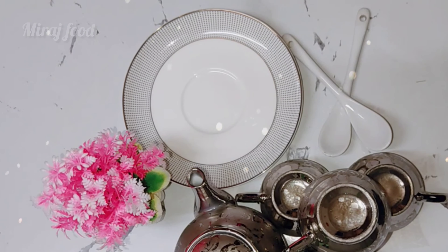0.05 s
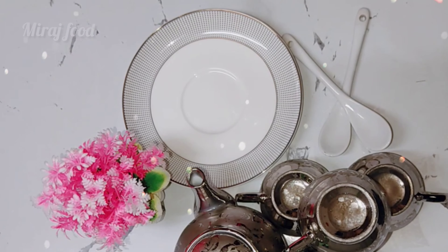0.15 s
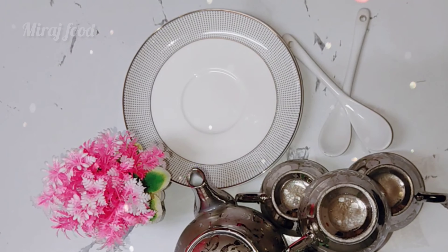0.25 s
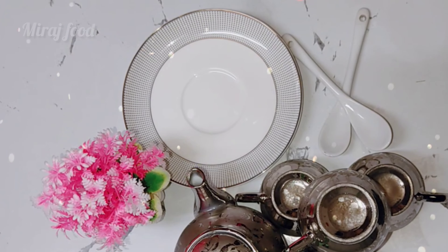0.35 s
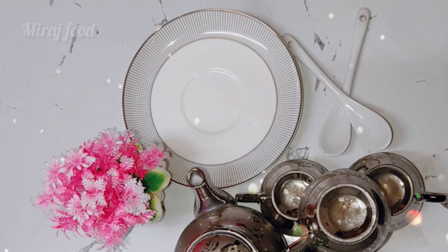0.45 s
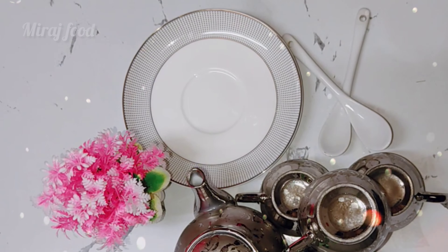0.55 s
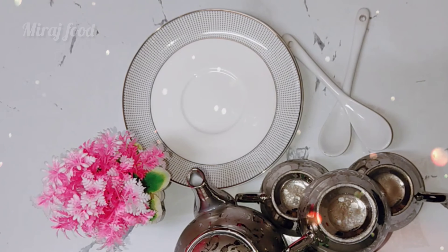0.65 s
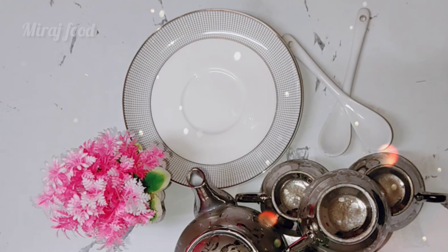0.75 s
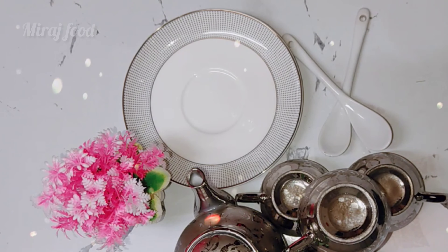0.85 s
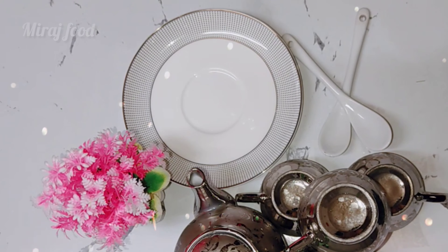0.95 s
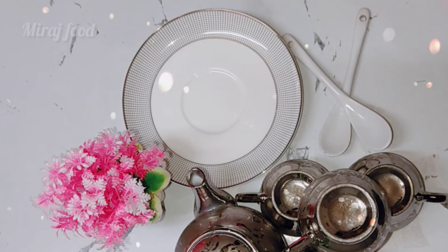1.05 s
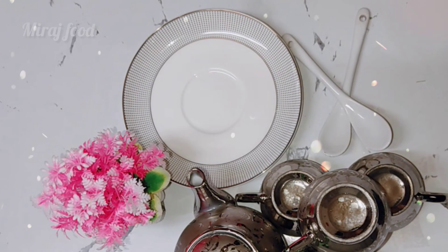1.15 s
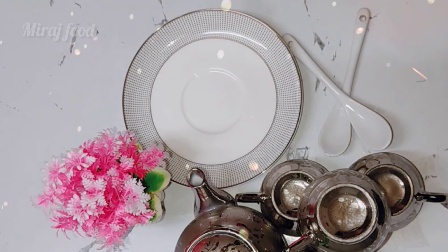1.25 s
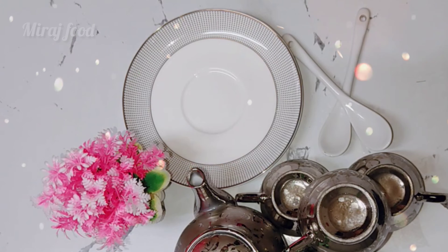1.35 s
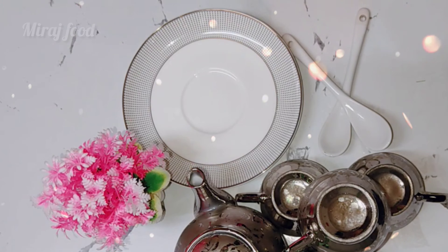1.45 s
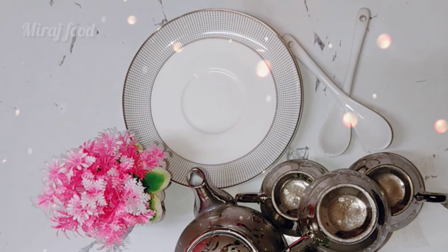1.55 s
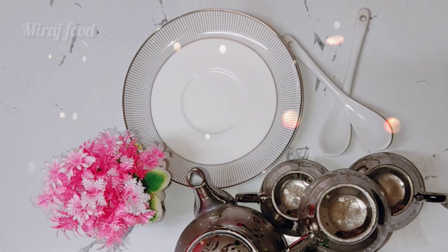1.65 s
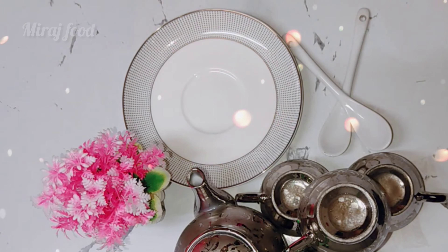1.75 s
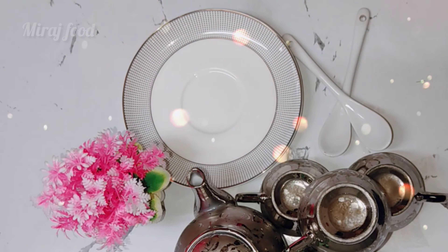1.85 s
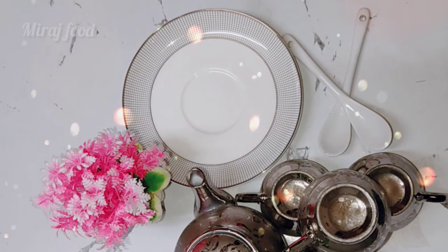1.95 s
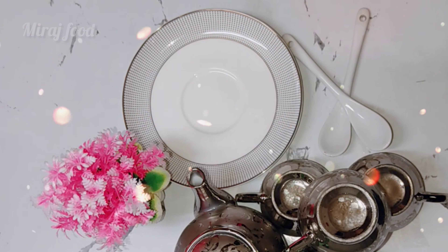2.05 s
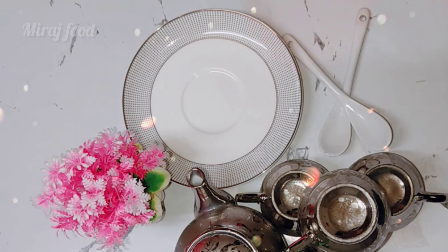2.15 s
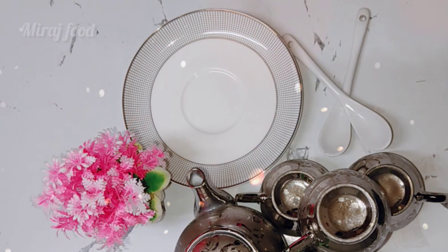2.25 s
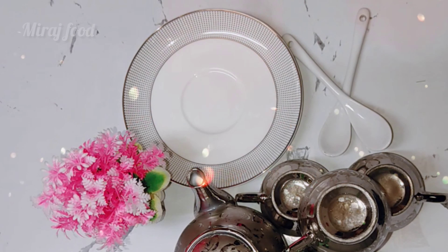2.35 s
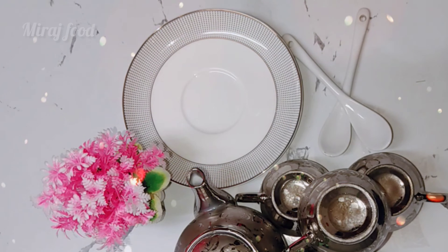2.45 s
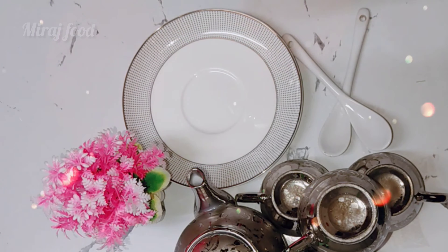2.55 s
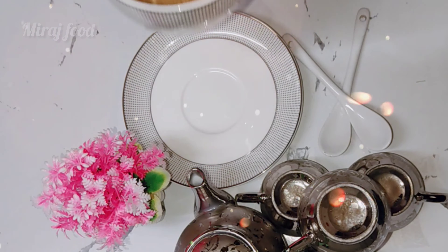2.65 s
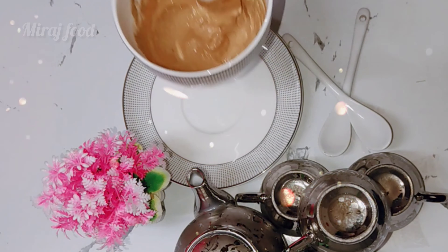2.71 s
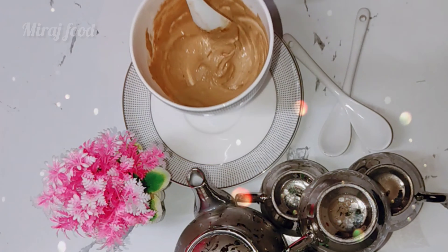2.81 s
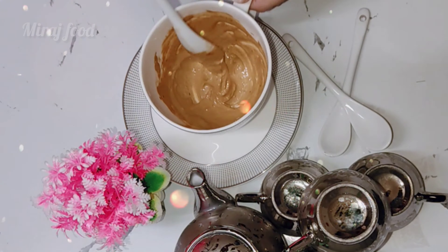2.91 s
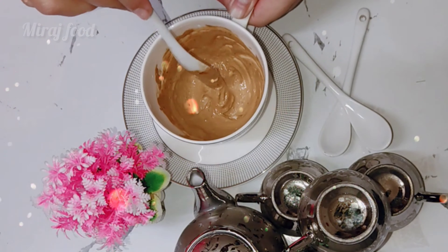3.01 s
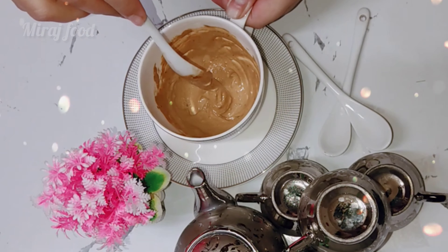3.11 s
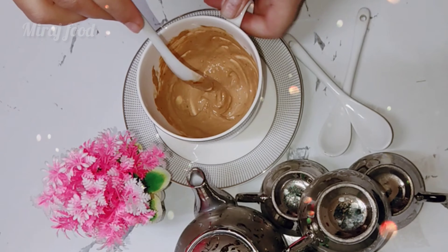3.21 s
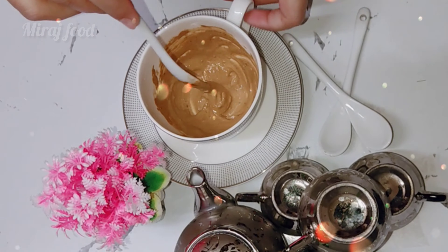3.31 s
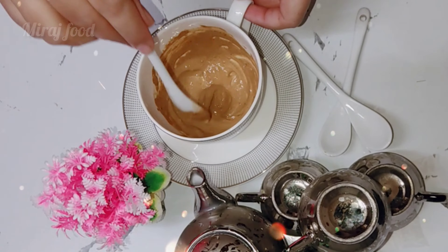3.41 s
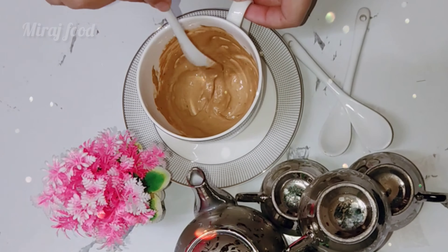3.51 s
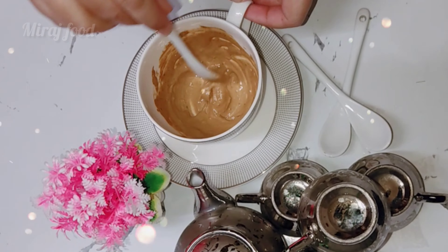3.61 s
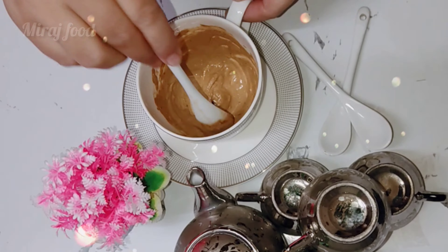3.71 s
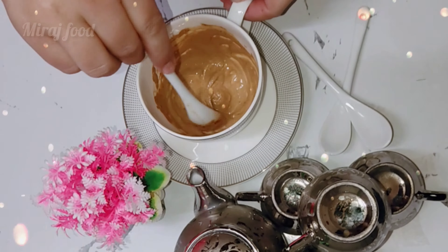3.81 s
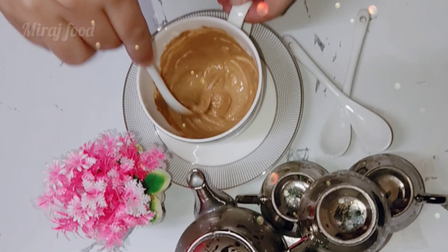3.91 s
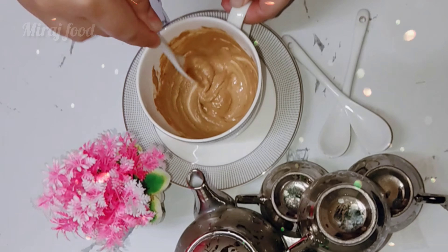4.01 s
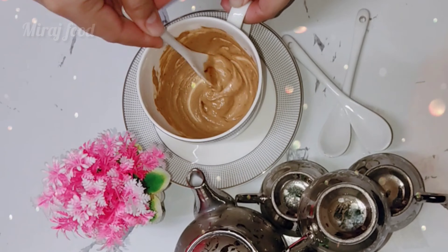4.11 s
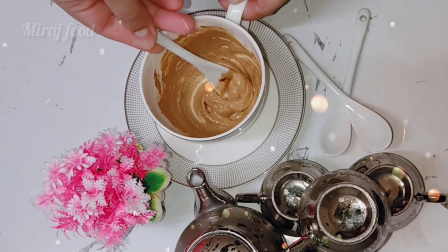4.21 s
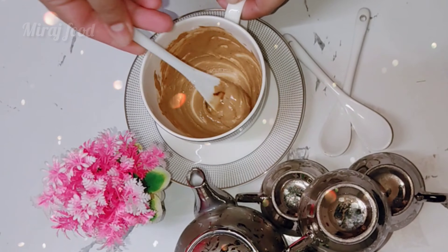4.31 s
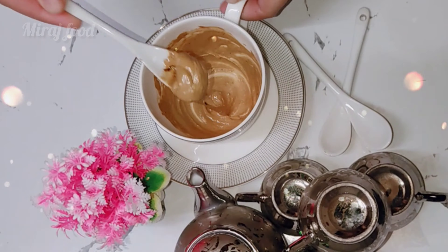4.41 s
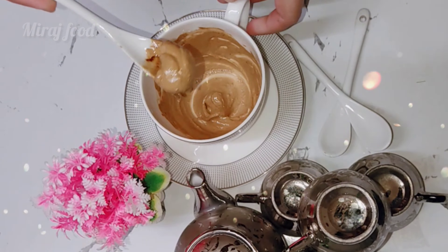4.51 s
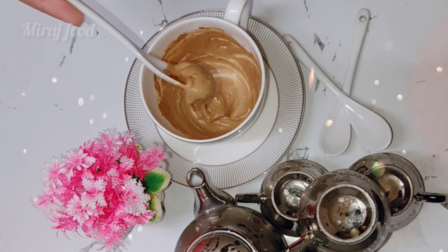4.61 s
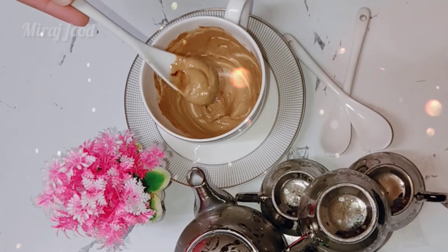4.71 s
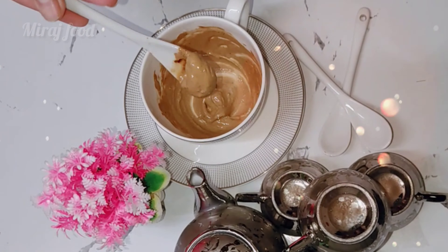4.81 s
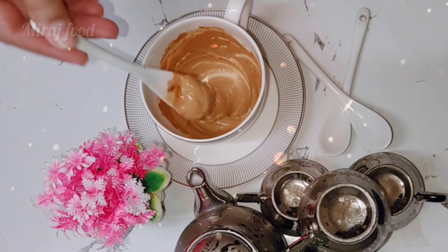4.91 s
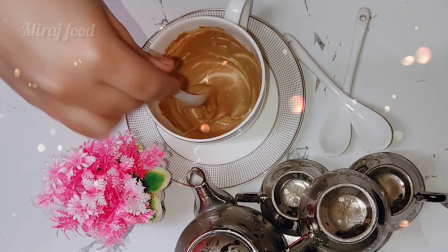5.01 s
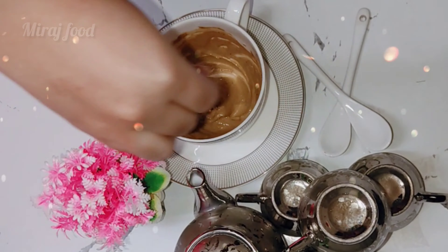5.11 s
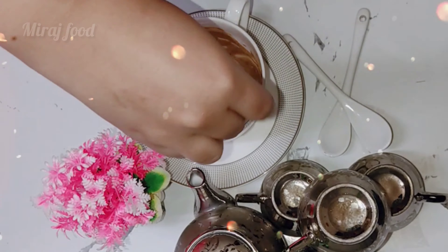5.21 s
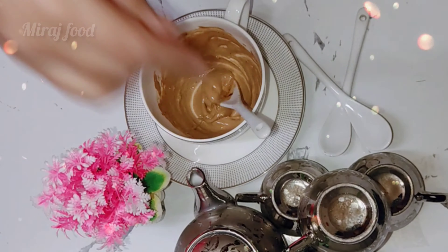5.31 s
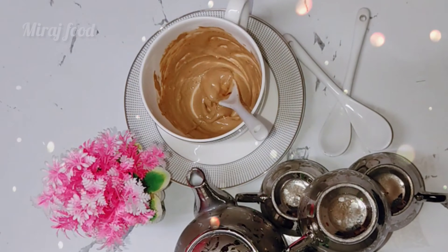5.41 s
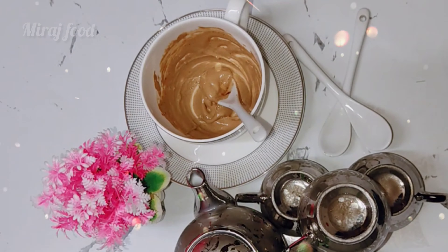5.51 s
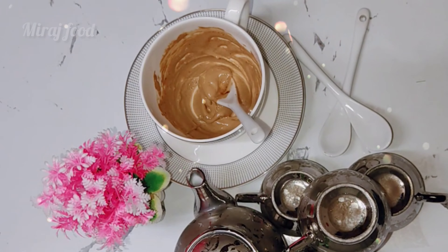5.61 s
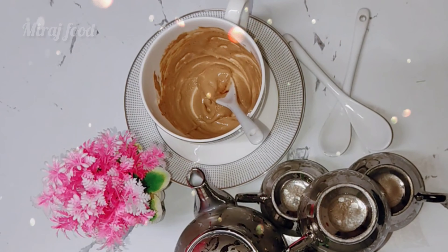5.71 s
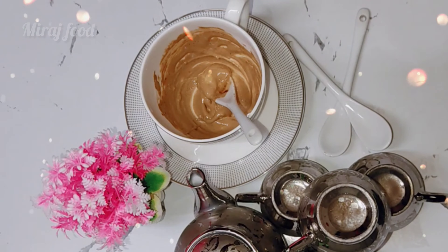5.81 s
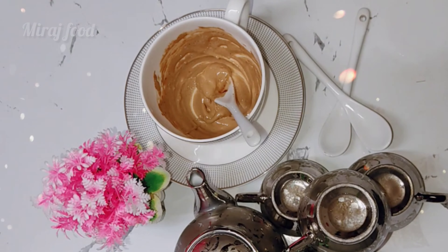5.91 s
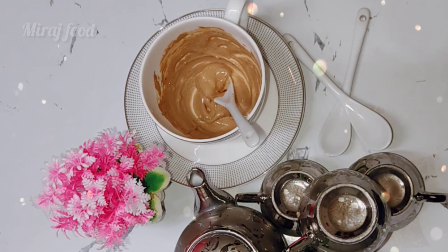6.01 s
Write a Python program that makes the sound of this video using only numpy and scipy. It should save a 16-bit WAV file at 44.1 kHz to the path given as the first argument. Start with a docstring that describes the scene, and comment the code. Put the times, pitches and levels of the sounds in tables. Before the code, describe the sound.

Light scrapes and taps of a spoon in a cup of thick cream, a knock on a saucer and one loud, bright ceramic clink.

```python
"""A ceramic spoon stirs thick cream in a cup: tiny slips on the glaze ring spoon and cup together,
while cream and fingers rustle and tick. The cup knocks onto its saucer, the table is bumped, and
the spoon drops on the rim, bounces and sinks into the cream. A quiet kitchen hums underneath,
its hiss lifted in the treble by a small microphone, and birds call faintly outside."""
import sys
import numpy as np
from scipy import signal
from scipy.fft import rfft, irfft, next_fast_len
from scipy.io import wavfile
from scipy.ndimage import uniform_filter1d

SR = 44100
rng = np.random.default_rng(int(sys.argv[2]) if len(sys.argv) > 2 else 0)


def int16_out(signal):
    """Quantize to a 16-bit WAV file."""
    q = np.round(np.clip(np.atleast_2d(signal).T, -1, 1) * 32767)
    wavfile.write(sys.argv[1], SR, q.astype(np.int16))


N = 267059


def amp(db):
    """Gain of a level in dB."""
    return 10 ** (np.asarray(db) / 20)


def unit_rms(x):
    """Scales to rms 1."""
    return x / np.sqrt(np.mean(x ** 2) + 1e-20)


def add(mix, start_s, peak_db, sound):
    """Mixes a sound in at the given peak level."""
    part = mix[round(start_s * SR):][:len(sound)]
    part += (amp(peak_db) * sound / abs(sound).max())[:len(part)]


def noise(count, spectrum):
    """Noise of rms 1 with the amplitude spectrum given as a function of Hz."""
    size = next_fast_len(count)
    hz = np.fft.rfftfreq(size, 1 / SR) + 1
    return unit_rms(irfft(rfft(rng.standard_normal(size)) * spectrum(hz), size)[:count])


def humps(bands):
    """Spectrum of bell curves. Each band: centre in Hz, width in Hz, level in dB."""
    return lambda hz: sum(amp(db) * np.exp(-2 * ((hz - centre) / width) ** 2)
                          for centre, width, db in bands)


# Room hiss. Each row: frequency in Hz, relative level in dB.
HISS_SPECTRUM = [(8.8, -31), (15, 3.5), (48, -12.5), (181, -25), (273, -26.5), (355, -27.5), (411, -29.5),
                 (1110, -37), (7920, -46), (15100, -45), (16500, -56.5)]
# Drone and rumble envelopes. Each row: time in seconds, level in dB.
DRONE_LEVELS = [(0, -77), (.35, -72.5), (.81, -72.5), (1.1, -82.5), (3.3, -85.5), (3.44, -69), (3.77, -89),
                (4.08, -77.5), (4.8, -80), (5.4, -90), (6.05, -76.5)]
RUMBLE_LEVELS = [(0, -65.5), (1, -63.5), (2.05, -75.5), (2.68, -62.5), (3.44, -70.5), (4.05, -63),
                 (4.55, -72.5), (5.2, -64.5), (6.05, -65)]


def room_tone():
    """Steady hiss lifted by the microphone's treble resonance, a wavering drone and deep rumble."""
    t = np.arange(N) / SR
    hiss_hz, hiss_db = np.transpose(HISS_SPECTRUM)
    shape = lambda hz: amp(np.interp(np.log(hz), np.log(hiss_hz), hiss_db))
    mic_lift = humps([(8500, 2100, -4.5)])
    hiss = amp(-67.5) * noise(N, lambda hz: shape(hz) * (1 + mic_lift(hz)))
    drone = amp(np.interp(t, *np.transpose(DRONE_LEVELS))) * noise(N, humps([(134, 86, 0)]))
    rumble = amp(np.interp(t, *np.transpose(RUMBLE_LEVELS))) * noise(N, humps([(26.8, 50, 0)]))
    return hiss + drone + rumble


# Movements of cream and hands. Each row: time of peak in seconds, swell in seconds, fade in seconds,
# treble level in dB, mid over treble in dB.
MOVES = [(.08, .09, 0.081, -72.5, -9), (.42, .22, 0.069, -79, 2.5), (.8, .06, .08, -73, -0.5),
         (3.86, .12, 0.54, -77.5, 2), (4.03, 0.15, 0.12, -76.5, -9), (4.14, 0.16, 0.067, -69.5, -6.5),
         (4.721, .11, 0.057, -72, -4), (5.6, .26, 0.15, -70, -5.5), (5.88, .13, 0.16, -68, -3),
         (6.05, .07, .07, -71.5, -7)]
REST_TREBLE_DB, REST_MID_DB, SWELL_DEPTH_DB = -85, -92, 16.5


def movement_gains():
    """Treble and mid rustle gains: each movement swells and fades above the rest level."""
    t = np.arange(N) / SR
    treble_power, mid_power = amp(REST_TREBLE_DB) ** 2, amp(REST_MID_DB) ** 2
    for peak_s, swell_s, fade_s, treble_db, mid_db in MOVES:
        distance = np.maximum((peak_s - t) / swell_s, (t - peak_s) / fade_s)
        power = amp(treble_db - SWELL_DEPTH_DB * distance) ** 2
        treble_power += power
        mid_power += amp(mid_db) ** 2 * power
    return np.sqrt(treble_power), np.sqrt(mid_power)


# Rustle bands. Each row: centre in Hz, width in Hz, relative level in dB.
TREBLE_BANDS = [(7700, 1500, -1.5), (9000, 1300, -1), (5200, 2200, -6), (11550, 3500, -13.5)]
MID_BANDS = [(1100, 1100, 2), (2440, 4000, -5)]


def cream_rustle():
    """Dense small crackles in uneven clumps, brighter or duller as cream and hands move."""
    grains = amp(2.4 * np.minimum(rng.exponential(1, N // 128 + 1), 5))
    crackle = unit_rms(uniform_filter1d(np.repeat(grains, 128)[:N], size=90))
    clumps = uniform_filter1d(rng.standard_normal((len(TREBLE_BANDS), N // 512 + 1)), size=3)
    treble = np.zeros(N)
    for (centre_hz, width_hz, db), clump in zip(TREBLE_BANDS, clumps):
        flicker_db = 6.5 * np.interp(np.arange(N) / 512, np.arange(len(clump)), clump)
        treble += amp(db + flicker_db) * noise(N, humps([(centre_hz, width_hz, 0)]))
    mid = noise(N, humps(MID_BANDS))
    treble_gain, mid_gain = movement_gains()
    return crackle * (treble_gain * unit_rms(treble) + mid_gain * mid)


def ring(modes_hz, modes, tilt_db_oct, rise_cycles, t60_scale=1):
    """Response to one soft contact: each mode builds up, then decays. Tilt pivots at 6 kHz."""
    hz = np.array(modes_hz)[:, None]
    db, t60_s = np.transpose(modes)[:, :, None]
    t = np.arange(round(t60_scale * SR / 8)) / SR
    gain = amp(db + tilt_db_oct * np.log2(hz / 6000))
    rise = 1 - np.exp(-t * hz / rise_cycles)
    decay = amp(-60 * t / (t60_scale * t60_s))
    return (gain * rise * decay * np.sin(2 * np.pi * hz * t)).sum(0)


# Spoon and cup modes: frequencies, then their rows. Each row: level in dB, T60 in seconds.
SPOON_HZ = [2973, 4155, 5952, 7052, 7420, 8622, 8848, 9040, 10228, 10620, 12930, 14510]
SPOON_MODES = [(-21.5, .1), (-29.5, .08), (-10.5, 0.0845), (-31, 0.086), (-25, 0.09), (-11.5, .07),
               (1, .062), (-28.5, .06), (-22.5, 0.055), (-40, 0.052), (-35, .06), (-45, .04)]
CUP_HZ = [330, 443, 680, 1068, 1180, 2116, 2734, 4918, 5227, 5534, 5835, 6394, 6842, 7833, 8236, 8322, 8431,
          9362, 9911, 12460]
CUP_MODES = [(-23, 0.05), (-21, 0.06), (-27, 0.021), (-15.5, 0.055), (-18, 0.066), (-36.5, 0.088),
             (-13, 0.099), (-9.5, 0.052), (-28.5, 0.067), (-37, .052), (-17, 0.05), (-16, .095),
             (-21, 0.049), (-34.5, 0.052), (-18, .07), (-2, 0.066), (-11.5, .06), (-21.5, .044),
             (-40.5, .06), (-32, 0.043)]


def spoon_on_cup(spoon_db, tilt_db_oct, t60_scale=1, contact_db=0):
    """Cup and spoon ring together; the place of contact weights the spoon's modes."""
    mode_db, t60_s = np.transpose(SPOON_MODES)
    weighted_modes = np.transpose([mode_db + contact_db, t60_s])
    cup = ring(CUP_HZ, CUP_MODES, tilt_db_oct, rise_cycles=8, t60_scale=t60_scale)
    spoon = ring(SPOON_HZ, weighted_modes, tilt_db_oct, rise_cycles=9.6, t60_scale=t60_scale)
    return cup + amp(spoon_db) * spoon


# Spoon strokes on the glaze. Each row: start in seconds, peak in dB, length in seconds,
# spoon over cup in dB, tilt in dB per octave.
SCRAPES = [(0.069, -54.5, 0.021, 4, -7), (.26, -63, 0.022, -5, -13), (0.366, -56.5, 0.043, 8, -7.5),
           (0.59, -60, 0.029, -4, -9.5), (0.762, -55.5, 0.061, 5, -4.5), (0.989, -42, 0.042, 5, 2),
           (1.176, -50, 0.045, 6, -6.5), (1.234, -59, 0.0092, 1, -4), (1.639, -28, .034, 10.5, 4.5),
           (1.7, -51.5, 0.013, 6, 13), (1.723, -52, 0.00143, 10, -2), (1.858, -64.5, 0.024, -12, -11),
           (1.953, -53.5, 0.021, 2, -2), (2.043, -59, 0.028, -14, -9), (2.108, -60, .03, 5, -3),
           (2.338, -59, 0.027, 5, 10)]
# Gain of each spoon mode when the tip is dragged.
DRAGGED_TIP_DB = [6.5, 6, -6.5, 6.5, 2.5, 3.5, -2.5, -17, 7, 9, 1, -4]
FIRM_STROKE_DB, SLIP_SPREAD_DB = -50, 3.5
CREAM_T60_SCALE, T60_SCALE_PER_DB = .48, .01


def spoon_scrapes():
    """Tiny slips drive the cream-damped modes; light strokes ring shorter and carry more grit."""
    out = np.zeros(N)
    grit_spectrum = humps([(8930, 1570, 6), (4940, 3800, -8), (2900, 440, -3.5),
                           (1076, 264, 3.5), (13300, 5300, -16)])
    for start_s, peak_db, length_s, spoon_db, tilt_db_oct in SCRAPES:
        count, force_db = round(length_s * SR), peak_db - FIRM_STROKE_DB
        slip_db = SLIP_SPREAD_DB * np.minimum(rng.exponential(1, 100), 4)  # one per millisecond
        stroke = signal.windows.tukey(count, .9) * amp(np.repeat(slip_db, SR // 1000)[:count])
        slips = stroke * rng.standard_normal(SR // 10)[:count]
        t60_scale = CREAM_T60_SCALE + T60_SCALE_PER_DB * force_db
        body = spoon_on_cup(spoon_db, tilt_db_oct, t60_scale, DRAGGED_TIP_DB)
        sound = signal.fftconvolve(slips, body)
        grit = stroke * noise(SR // 10, grit_spectrum)[:count]
        sound[:count] += amp(-.65 * force_db) * sound[:count + 300].std() * grit
        add(out, start_s, peak_db, sound)
    return out


# Dry ticks. Each row: start in seconds, peak in dB, centre in Hz.
TICKS = [(0.406, -61, 9000), (0.43, -53.5, 9700), (0.494, -56.5, 6460), (0.504, -61, 7740),
         (0.7094, -65, 7710), (0.819, -58.5, 5000), (1.385, -62, 7500), (2.1018, -55, 9500),
         (2.7584, -59, 8300), (3.85, -61, 8650), (3.919, -59, 7400), (3.947, -58, 7700),
         (3.968, -51.5, 8840), (4.0152, -55, 9400), (4.646, -59, 7650), (4.7336, -49.5, 8800),
         (5.8378, -60, 8080), (5.8693, -44.5, 9600), (5.9534, -53, 8450)]
TICK_WIDTH_OCT, TICK_T60_S, TICK_CUTOFF_HZ = .27, .013, 10300


def dry_ticks():
    """Cream and fingers give short puffs of high noise."""
    out, t = np.zeros(N), np.arange(SR // 4) / SR
    for start_s, peak_db, centre_hz in TICKS:
        bell = lambda hz: np.exp(-.5 * (np.log2(hz / centre_hz) / TICK_WIDTH_OCT) ** 2)
        puff = noise(len(t), lambda hz: bell(hz) / (1 + (hz / TICK_CUTOFF_HZ) ** 8))
        add(out, start_s, peak_db, puff * amp(-60 * t / TICK_T60_S))
    return out


# Call shapes. Each: length in seconds, start pitch in Hz, end over start pitch, width in Hz.
LOW_CALL_SHAPE = (0.089, 1730, .975, 420)
CHIRP_SHAPE = (.065, 5300, .71, 1500)
PEEP_SHAPE = (.036, 3470, 1, 160)
HIGH_PEEP_SHAPE = (0.034, 4350, 1, 150)
# Calls of each shape. Each row: start in seconds, peak in dB before the mix gain.
LOW_CALLS = [(1.312, -76.5), (1.47, -79.5), (2.645, -80), (2.899, -74.5), (3.129, -78), (4.318, -78),
             (5.959, -76.5)]
CHIRPS = [(2.819, -73), (2.929, -75), (3.114, -74.5)]
PEEPS = [(3.21, -85.5), (3.307, -82), (3.37, -79.5), (3.463, -84), (3.537, -83), (4.858, -82), (4.94, -85),
         (5.027, -89)]
HIGH_PEEPS = [(3.483, -84), (4.788, -87)]


def birds():
    """Blurred whistles: slow noise modulates a steady or falling tone."""
    out = np.zeros(N)
    kinds = [(LOW_CALL_SHAPE, LOW_CALLS), (CHIRP_SHAPE, CHIRPS),
             (PEEP_SHAPE, PEEPS), (HIGH_PEEP_SHAPE, HIGH_PEEPS)]
    for (length_s, start_hz, glide, width_hz), calls in kinds:
        count = round(length_s * SR)
        phase = 2 * np.pi * np.cumsum(np.linspace(start_hz, start_hz * glide, count)) / SR
        blur = humps([(0, width_hz, 0)])
        for start_s, peak_db in calls:
            in_phase, quadrature = (noise(SR // 5, blur)[:count] for _ in range(2))
            whistle = in_phase * np.cos(phase) + quadrature * np.sin(phase)
            add(out, start_s, peak_db, whistle * signal.windows.tukey(count, .5))
    return out


# Modes of the saucer and the cream-filled cup bottom: frequencies, then their rows.
# Each row: level in dB, T60 in seconds.
SAUCER_HZ = [150, 250, 447, 620, 781, 1007, 1308, 1680, 2169, 2751, 4527, 5324, 6842, 8333, 8909, 9450]
SAUCER_MODES = [(-16.5, 0.029), (-19, 0.052), (-9, 0.044), (-8, 0.027), (-9, 0.03), (-6.5, 0.03),
                (-0.5, 0.012), (-22, 0.029), (-13.5, 0.017), (-1.5, 0.0251), (-11, 0.034), (-18.5, .02),
                (-20, 0.025), (-32.5, 0.018), (-26, 0.027), (-26.5, 0.077)]
CUP_BOTTOM_HZ = [340, 400, 1160, 1250, 3050]
CUP_BOTTOM_MODES = [(-8.5, 0.033), (-1.5, 0.043), (1, 0.032), (-15.5, 0.086), (-26, 0.022)]
# Knocks. Each row: start in seconds, peak in dB, tilt in dB per octave, seconds for the chatter
# to fall 30 dB, cup bottom over saucer in dB.
KNOCKS = [(3.0131, -24, -0.33, 0.0024, -11), (3.111, -55.5, -3, 0.075, 4.5), (3.831, -64.5, -12, 0.11, 20),
          (3.891, -44.5, -1, 0.016, 26), (3.909, -55.5, -8, 0.081, 1), (3.955, -63, 1, 0.13, 7),
          (4.004, -59.5, 6, 0.044, 12), (4.045, -66.5, 0, .08, 8), (4.142, -55, 16, 0.016, 17),
          (4.164, -63, 1, 0.023, 12), (4.24, -54, 3.5, 0.016, 15), (4.644, -60, 1, 0.0069, 6.5),
          (4.702, -65, -10, 0.14, 13), (5.867, -53, 2.5, .003, 7.5), (5.931, -56.5, -13.5, 0.041, -4.5)]


def cup_knocks():
    """Cup foot on saucer, spoon on cup bottom: short rings under load; slow contacts chatter."""
    out, t = np.zeros(N), np.arange(SR // 8) / SR
    for start_s, peak_db, tilt_db_oct, chatter_s, bottom_db in KNOCKS:
        contact = rng.standard_normal(len(t)) * amp(-19 - 30 * t / chatter_s)
        contact[0] = 1  # first touch
        saucer = ring(SAUCER_HZ, SAUCER_MODES, tilt_db_oct, rise_cycles=.98)
        bottom = ring(CUP_BOTTOM_HZ, CUP_BOTTOM_MODES, tilt_db_oct, rise_cycles=1.3)
        add(out, start_s, peak_db, signal.fftconvolve(contact, saucer + amp(bottom_db) * bottom))
    return out


# Table top modes: frequencies, then their rows. Each row: level in dB, T60 in seconds.
TABLE_HZ = [48, 68, 150]
TABLE_MODES = [(-2.5, 0.45), (-7, 0.35), (-2.5, 0.079)]
RELEASE_S, PUSH_S, BUMP_PEAK_DB = 3.403, .012, -38.5


def table_bump():
    """A push builds and lets go, and the table top wobbles."""
    out, t = np.zeros(N), np.arange(SR // 4) / SR
    wobble = sum(amp(db - 60 * t / t60_s) * np.cos(2 * np.pi * hz * t)
                 for hz, (db, t60_s) in zip(TABLE_HZ, TABLE_MODES))
    push = wobble[0] * np.linspace(0, 1, round(PUSH_S * SR)) ** 2
    add(out, RELEASE_S - PUSH_S, BUMP_PEAK_DB, uniform_filter1d(np.r_[push, wobble], size=60))
    return out


# Spoon impacts on the rim. Each row: start in seconds, peak in dB, spoon over cup in dB,
# tilt in dB per octave, crack gain in dB.
BOUNCES = [(5.226, -28, 3, -0.4, -15), (5.2265, -7.5, 3.5, 2.5, -15.5), (5.2309, -16.5, -6, -3, -23),
           (5.2373, -17, -4.5, -0.5, -18), (5.2474, -27, -6, -0.9, -11.5), (5.255, -29.5, -3.5, 4.5, -15.5)]
CRACK_RISE_S, CRACK_T60_S = .0006, .033
SINK_START_S, SINK_LENGTH_S, SINK_DB = 5.2575, .0045, -6.5


def spoon_drop():
    """Each bounce cracks and rings spoon and cup; the ring is damped as the spoon sinks into the cream."""
    out, t = np.zeros(N), np.arange(round(SR / 8)) / SR
    crack_spectrum = humps([(7900, 2000, -3), (1740, 2200, -1.5), (552, 430, -11.5), (15000, 2100, -19)])
    crack_envelope = (1 - np.exp(-t / CRACK_RISE_S)) * amp(-60 * t / CRACK_T60_S)
    for start_s, peak_db, spoon_db, tilt_db_oct, crack_db in BOUNCES:
        crack = amp(crack_db) * crack_envelope * noise(len(t), crack_spectrum)
        add(out, start_s, peak_db, spoon_on_cup(spoon_db, tilt_db_oct) + crack)
    sunk = np.clip((np.arange(N) / SR - SINK_START_S) / SINK_LENGTH_S, 0, 1)
    return out * amp(SINK_DB * sunk)


def reflections(x, early_t60_s=.06, late_t60_s=.15):
    """Sparse echoes from table and walls, dying fast."""
    taps, t = np.zeros(SR // 4), np.arange(SR // 4) / SR
    slots = np.arange(60, len(taps) - 20, 20)
    taps[slots + rng.integers(0, 20, len(slots))] = rng.choice([-1., 1.], len(slots))
    taps *= amp(-60 * t / early_t60_s) + amp(-24 - 60 * t / late_t60_s)
    return signal.fftconvolve(x, taps / np.linalg.norm(taps))[:N]


def scene():
    """Mono mix: close table sounds, more reverberant birds, rustle and room tone."""
    near = spoon_scrapes() + dry_ticks() + cup_knocks() + table_bump() + spoon_drop()
    far = birds()
    reflected = reflections(amp(-13) * near + amp(-1) * far)
    return (near + amp(3.5) * far + reflected + cream_rustle() + room_tone())[None]


BAND_LIMIT_HZ = 15800


def record(dry):
    """Steep low-pass at the band limit."""
    lowpass = signal.firwin(511, BAND_LIMIT_HZ, window=("kaiser", 9), fs=SR)
    return signal.oaconvolve(dry, lowpass[None], "same")


dry = scene()
out = record(dry)
int16_out(out)
```